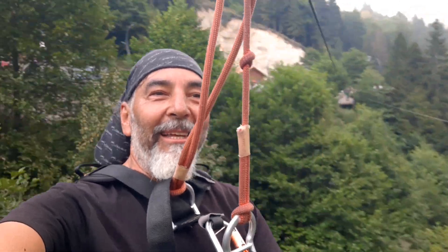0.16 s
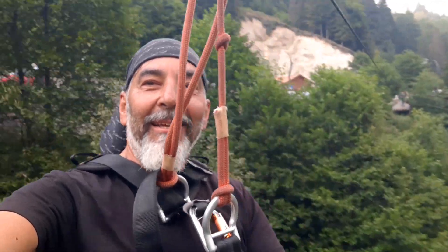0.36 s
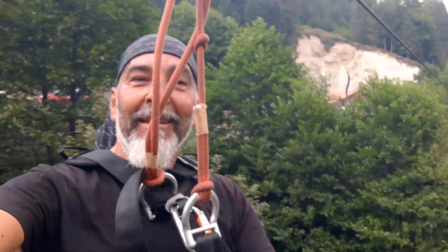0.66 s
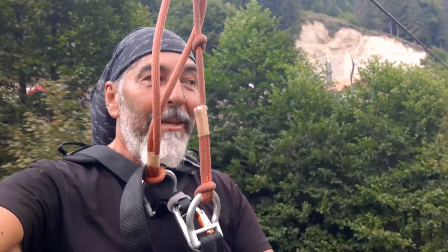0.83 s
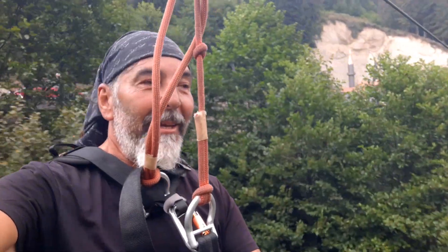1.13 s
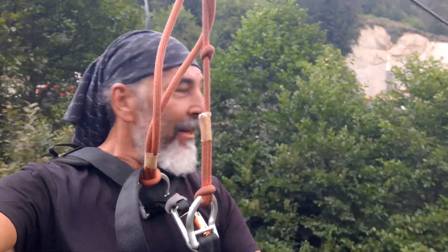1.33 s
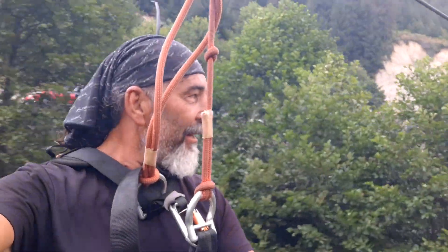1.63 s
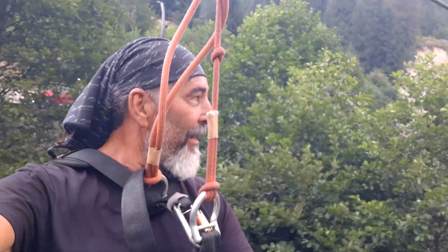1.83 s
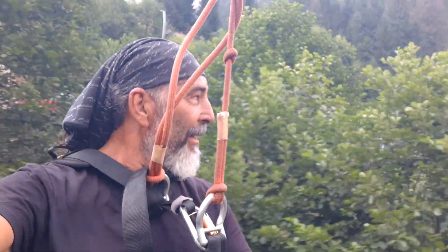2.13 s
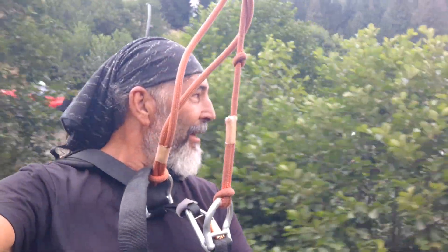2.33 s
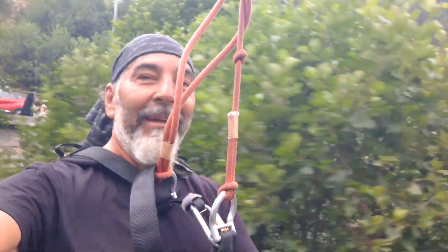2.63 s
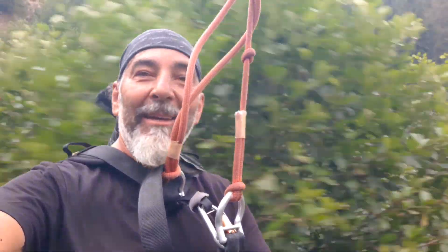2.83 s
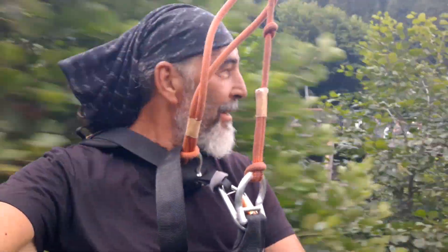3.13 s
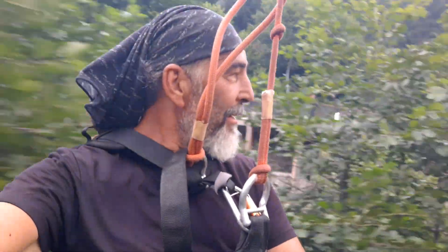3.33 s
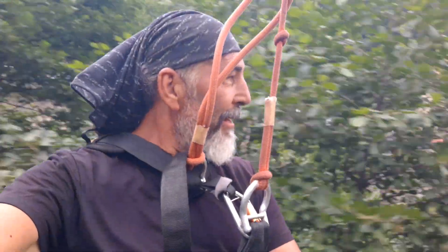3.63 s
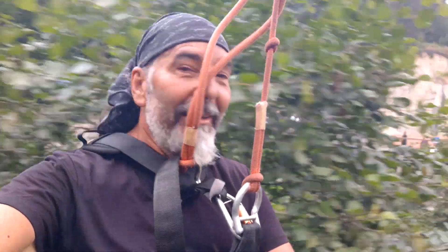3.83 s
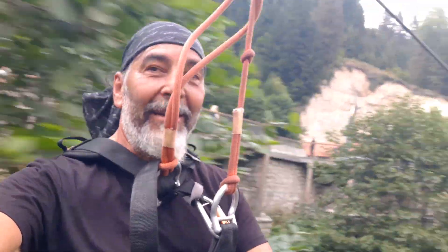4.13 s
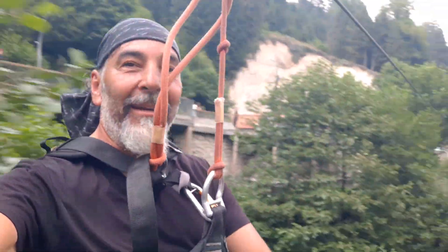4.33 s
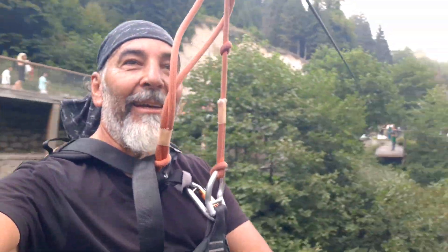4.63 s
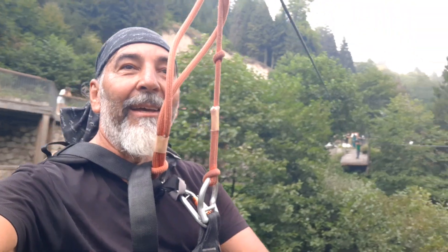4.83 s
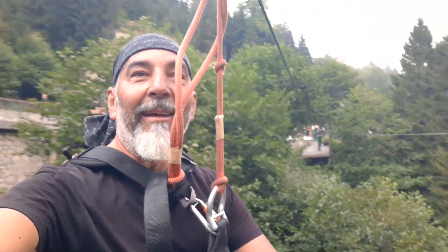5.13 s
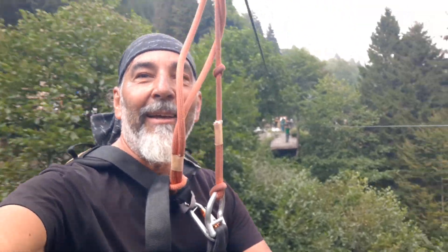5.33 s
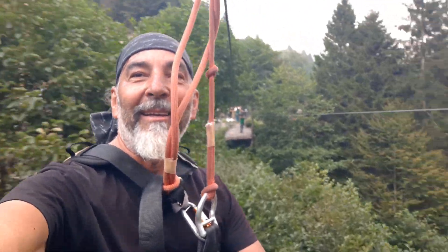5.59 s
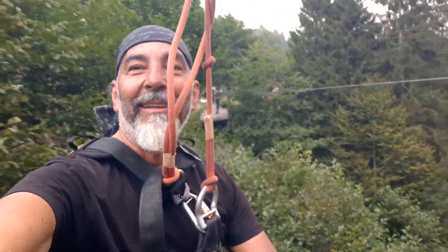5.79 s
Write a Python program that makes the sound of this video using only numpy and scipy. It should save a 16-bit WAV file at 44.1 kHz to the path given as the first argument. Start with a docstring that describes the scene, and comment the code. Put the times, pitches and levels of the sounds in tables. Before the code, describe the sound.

Outdoors in a wooded valley, a pulley trolley races along a steel cable just above the rider. A steady, dense metallic hiss buzzes with a very rapid flutter, a thin whine inside it. Small rough ticks and rubbing swells come and go, wind thumps softly in gusts, and a rasping scrape joins near the end. Close handheld stereo microphone, no echo.

```python
"""A wooded valley, crossed by a zipline: a trolley runs along a steel cable, heard by the rider below it.
The sheaves roll over the twisted strands: shaped noise gives a dense metallic hiss that throbs once a turn.
Trolley parts ring with it, burrs and rubs break in, and faint sine whines sink as the ride slows.
The trolley turns brighter and fuller or duller and thinner, and the lead of the left channel shifts;
low noise in gusts is the airstream buffeting two ports, and late in the ride the cable scrapes a cheek."""
import sys
import numpy as np
from scipy import signal
from scipy.fft import rfft, irfft, next_fast_len
from scipy.io import wavfile
from scipy.ndimage import map_coordinates

SR = 44100
rng = np.random.default_rng(int(sys.argv[2]) if len(sys.argv) > 2 else 0)


def pcm_store(signal):
    """Save signal as 16-bit PCM."""
    levels = np.round(np.clip(np.atleast_2d(signal), -1, 1) * 32767)
    wavfile.write(sys.argv[1], SR, levels.astype(np.int16).T)


N = 262664
TIME = np.arange(N) / SR
# frequency grid with room for filter tails; the floor of 1 Hz allows logarithms
FREQS = np.maximum(np.fft.rfftfreq(2 * next_fast_len(N // 2 + 1), 1 / SR), 1)


def from_db(db):
    """Decibels to gain."""
    return 10 ** (np.asarray(db) / 20)


def rms_one(x):
    """Scale to unit rms, over all rows together."""
    return x / np.sqrt(np.mean(x ** 2) + 1e-20)


def in_time(rows):
    """Each column of a curve, at every sample."""
    s, *columns = np.transpose(rows)
    return [np.interp(TIME, s, column) for column in columns]


def in_hz(points):
    """A short spectrum, at every frequency, joined along a logarithmic axis."""
    hz, value = np.transpose(points)
    return np.interp(np.log(FREQS), np.log(hz), value)


def shaped(x, gain):
    """Filter by a gain per frequency."""
    spectrum = rfft(x, 2 * (len(FREQS) - 1))
    return irfft(spectrum * gain)[..., :N]


def coloured(x, colour):
    """Filter to a relative spectrum in dB; rms 1."""
    return rms_one(shaped(x, from_db(in_hz(colour))))


def drift(rate_hz):
    """Random wandering with rms 1, mostly slower than the given rate."""
    return rms_one(shaped(rng.standard_normal(N), 1 / (1 + (FREQS / rate_hz) ** 2)))


def ring(x, modes):
    """Drive damped resonances, whose powers add; widths lie about 11 dB below each peak; rms 1."""
    power = 0
    for hz, width_hz, db in modes:
        offset = (FREQS - hz) / (0.32 * width_hz)
        power = power + from_db(db) ** 2 / (1 + offset ** 2) ** 2
    return rms_one(shaped(x, np.sqrt(power)))


def noise_paths():
    """Independent noise for the direct path and the two scattered paths."""
    return rng.standard_normal((3, N))


def chatter():
    """Quick uneven surges that one part of the trolley has for itself; rms 1."""
    rate_hz, spread_db = 110, 2.2
    return rms_one(from_db(spread_db * drift(rate_hz)))


# sheave speed along the ride: (time [s], speed [turns/s])
SHEAVE_SPEED = [(0, 47.5), (.3, 48), (1.25, 48.6), (2.6, 48.6), (2.75, 48.05), (3.6, 47.9), (4, 46.85),
                (4.7, 46.2), (5.05, 46.3), (5.6, 45.45), (5.96, 45.3)]


def sheave_speed():
    """Turns per second of the sheaves rolling along the cable."""
    return in_time(SHEAVE_SPEED)[0]


# how bright and full the trolley sounds, and how far the left channel leads:
# (time [s], fullness [0-1], lead [ms])
STEREO_SHIFT = [(0, 0.47, 0.083), (.27, 0.18, 0.067), (.38, 0.26, 0.041), (.69, 0.32, 0.03),
                (.75, 0, 0.007), (1.1, 0.1, 0.016), (1.6, 0.26, 0.032), (2.4, 0.6, 0.08),
                (3.07, 0.69, 0.083), (3.18, 0.55, 0.11), (3.68, 0.89, .13), (4.12, 1, 0.092),
                (4.36, 0.83, 0.053), (4.8, 0.26, 0.046), (5.96, 0.89, 0.029)]


def stereo_shift():
    """How bright and full the trolley sounds (0-1), and how far the left channel leads (ms)."""
    return in_time(STEREO_SHIFT)


def loudness(law):
    """Gain of a part: its level shifts with speed and with the fullness of the trolley sound."""
    cruise_turns_per_s = 48
    base_db, full_db, speed_db = law
    fullness, _ = stereo_shift()
    overspeed = sheave_speed() - cruise_turns_per_s
    return from_db(base_db + full_db * fullness + speed_db * overspeed)


def contact_force(turns, flutter_db, grains_per_s, grain_db):
    """Strands striking the groove in tiny impacts, pressed harder once a turn."""
    throb_db, throb_sharpness = 4.2, 2.4
    flutter_hz = 60
    grain_share = .33  # of the mean power
    bump = np.exp(throb_sharpness * (np.cos(2 * np.pi * turns) - 1))
    load = from_db(throb_db * bump + flutter_db * drift(flutter_hz))
    born = rng.random(N) < grains_per_s / SR
    sizes = from_db(grain_db * np.minimum(rng.exponential(1, N), 3))
    # each impact scatters into a rattle that decays in about 0.7 ms
    scatter = np.exp(-np.arange(200) / 30)
    rattle = signal.lfilter(scatter, [1], born * sizes ** 2)
    grain_power = rattle / rattle.mean()
    return rms_one(load * np.sqrt(1 - grain_share + grain_share * grain_power))


# broad colour of steel rolling on steel: (frequency [Hz], relative level per Hz [dB])
CABLE_COLOUR = [(40, -37), (250, -32.5), (480, -29.5), (690, -25), (800, -17.5), (1000, -16), (1350, -12),
                (2100, -6.5), (2680, -4), (2950, -4), (4000, -3), (4450, -5.5), (5800, -16), (7400, -29)]
# (level at fullness 0 and cruising speed [dB], gain at fullness 1 [dB], gain per extra turn per second [dB])
CABLE_LOUDNESS = (-19.3, 0.5, 0.85)


def cable_hiss(heavy_force):
    """The cable hisses under the sheaves; being heavy, it evens the impacts out."""
    return loudness(CABLE_LOUDNESS) * coloured(heavy_force * noise_paths(), CABLE_COLOUR)


# resonances of the sheave: (frequency [Hz], width [Hz], relative level [dB])
SHEAVE_RESONANCES = [(3240, 54, 0.5), (3362, 97, 3), (3483, 92, 4.5), (3580, 130, -3), (3688, 240, 1.5),
                     (3910, 190, -1), (4170, 890, -11.5)]
# its ring as the load changes: (time [s], shift of the resonances [Hz], level [dB])
SHEAVE_LOAD = [(0, 0, -21), (.4, 20, -20.5), (.6, 10, -23.5), (.85, 0, -21.5), (1.05, 0, -24),
               (1.25, -10.5, -21), (1.55, -20, -25), (1.8, 30, -23), (2.3, 0, -24), (2.55, 30, -18.5),
               (2.8, 9.5, -22), (3.05, 0.5, -22), (3.15, 40.5, -26), (3.6, 0, -21), (4.05, 0, -21),
               (4.4, 60, -21), (4.58, 39.5, -21.5), (4.8, 30, -22.5), (5.17, 20.5, -23),
               (5.45, -70.5, -22.5), (5.96, -89.5, -21)]


def sheave_ring(force):
    """The sheave rings in a narrow ridge that rises and sinks with the load, in uneven bursts."""
    wander_per_s, wander_hz = 8, 30
    bursts_per_s, burst_db = 40, 1.0
    shift_hz, db = in_time(SHEAVE_LOAD)
    shift_hz = shift_hz + wander_hz * drift(wander_per_s)
    ringing = ring(force * noise_paths(), SHEAVE_RESONANCES)
    # the analytic signal lets the whole ridge slide in frequency
    ridge = signal.hilbert(ringing, next_fast_len(N))[..., :N]
    moved = np.real(ridge * np.exp(2j * np.pi * np.cumsum(shift_hz) / SR))
    return from_db(db + burst_db * drift(bursts_per_s)) * moved


# resonances of the sheave rim: (frequency [Hz], width [Hz], relative level [dB])
RIM_RESONANCES = [(4380, 1500, 2.8), (4780, 160, 9.8), (5120, 710, 12.9), (5586, 370, 12.7),
                  (5747, 190, 13.6), (6060, 400, 6.7)]
# (level at fullness 0 and cruising speed [dB], gain at fullness 1 [dB], gain per extra turn per second [dB])
RIM_LOUDNESS = (-25, 4.5, 0.5)


def rim_ring(heavy_force, rim_rub, flange_rub):
    """The rim rings while rolling and rubbing; a leaning flange damps it."""
    damped_at_db = -33  # flange rub that halves the power of the ring
    rim_free = 1 / np.hypot(1, flange_rub / from_db(damped_at_db))
    level = rim_free * np.hypot(loudness(RIM_LOUDNESS), rim_rub)
    return level * ring(heavy_force * noise_paths() * chatter(), RIM_RESONANCES)


# resonances of the side plates: (frequency [Hz], width [Hz], relative level [dB])
PLATE_RESONANCES = [(902, 420, -15.5), (1384, 284, -6.5), (1650, 200, -7), (1928, 180, 0.5),
                    (2150, 440, 2.5), (2986, 270, -1)]
# (level at fullness 0 and cruising speed [dB], gain at fullness 1 [dB], gain per extra turn per second [dB])
PLATE_LOUDNESS = (-31, 12.5, 3.5)


def plate_ring(heavy_force):
    """The heavy side plates ring low, with the impacts evened out."""
    return loudness(PLATE_LOUDNESS) * ring(heavy_force * noise_paths(), PLATE_RESONANCES)


# colour of the fine asperities: (frequency [Hz], relative level per Hz [dB])
FIZZ_COLOUR = [(4000, -17.5), (7700, -26), (8400, -1.5), (9000, -2.5), (9700, -5), (10100, 9), (10550, 5.5),
               (10900, 2.5), (11300, 5.5), (11800, 0.5), (12400, 8.5), (13000, 1), (13550, -1), (13800, 0),
               (14400, 6), (14900, -3), (16000, -5.5)]
# (level at fullness 0 and cruising speed [dB], gain at fullness 1 [dB], gain per extra turn per second [dB])
FIZZ_LOUDNESS = (-37, 10.5, 2)


def asperity_fizz(fine_force, fizz_rub):
    """Fine asperities fizz in the treble, flickering, and swell with a rub."""
    flicker_hz, flicker_db = 6.4, 1.1
    fine = from_db(flicker_db * drift(flicker_hz)) * fine_force * noise_paths()
    return np.hypot(loudness(FIZZ_LOUDNESS), fizz_rub) * coloured(fine, FIZZ_COLOUR)


# high resonances of the bearings: (frequency [Hz], width [Hz], relative level [dB])
BEARING_RESONANCES = [(7100, 170, 9), (7560, 440, 9), (8330, 590, 6), (8900, 570, 4.5), (9900, 260, -1),
                      (10770, 190, 13), (12445, 180, 1), (13200, 300, 4), (14100, 300, 5), (15250, 400, -7)]
# (level at fullness 0 and cruising speed [dB], gain at fullness 1 [dB], gain per extra turn per second [dB])
BEARING_LOUDNESS = (-40, -5, -2.5)


def bearing_ring(force):
    """The light bearings follow every impact and ring high, in chattering surges."""
    return loudness(BEARING_LOUDNESS) * ring(force * noise_paths() * chatter(), BEARING_RESONANCES)


# bright edge of the hiss: (frequency [Hz], relative level per Hz [dB])
HISS_EDGE_COLOUR = [(3500, -47), (4400, -10), (5700, 15), (6100, 25), (6600, 22), (6950, 19.5), (7250, 13),
                    (7600, -40)]
# (level at fullness 0 and cruising speed [dB], gain at fullness 1 [dB], gain per extra turn per second [dB])
EDGE_LOUDNESS = (-40, 18, 3.5)


def hiss_edge(heavy_force):
    """A bright band edges the hiss, strongest where the trolley sounds fullest."""
    return loudness(EDGE_LOUDNESS) * coloured(heavy_force * noise_paths() * chatter(), HISS_EDGE_COLOUR)


# partials of the whine:
# (multiple of the sheave speed, peak level [dB rms], time of the peak [s], standard deviation of swell [s])
WHINE_PARTIALS = [(11, -59.5, 1.3, 1.2), (12, -62.5, 2.6, 1.4), (13.03, -54.5, 1.9, 1.9),
                  (13.03, -56, 5.1, .5), (16.05, -44.5, 1.2, 1.5), (16.94, -50, 2.6, .8),
                  (18.05, -51, 3, 2.2), (18.9, -51.5, .9, .7), (19, -51, 3, .5), (22, -49.5, 3.8, .25),
                  (23.96, -43.8, 3.2, 3.4), (26.1, -51, 4.7, .3), (27, -50, 1.3, 1.2), (29, -46, 5.65, .25)]


def whine(turns):
    """Ripples worn into the groove sing at multiples of the sheave speed; slip makes them waver."""
    blur_rad, blur_hz = .32, 22
    waver_hz, waver_db = 7, 2.7
    tones = 0
    for order, db, s, length_s in WHINE_PARTIALS:
        phase = 2 * np.pi * (order * turns + rng.random()) + blur_rad * drift(blur_hz)
        swell = np.exp(-.5 * ((TIME - s) / length_s) ** 2)
        level = from_db(db + waver_db * drift(waver_hz))
        tones = tones + swell * level * np.sin(phase)
    return np.sqrt(2) * tones


# colour of the large eddies: (frequency [Hz], relative level per Hz [dB])
LARGE_EDDY_COLOUR = [(20, -34), (40, -21), (65, -2.5), (110, 1.5), (170, 1), (250, -7.5), (350, -15),
                     (600, -23), (1500, -52)]
# smaller eddies: (frequency [Hz], width [Hz], relative level [dB])
SMALL_EDDY_BANDS = [(224, 210, 0)]
# gusts and one brief lull on the ports: (time [s], level change [dB], half-length to 1/e of the change [s])
PORT_GUSTS = [(0.07, 10.5, 0.057), (.45, 4, 0.083), (1.2, 6, 0.046), (1.316, 6, .05), (1.5, 4.5, .08),
              (1.77, 5, 0.14), (2.02, 9, 0.084), (2.2, 4, 0.055), (2.33, 4.5, 0.045), (2.46, 6.5, 0.075),
              (2.634, 7.5, .03), (2.82, 4.5, 0.086), (2.97, 5.5, 0.034), (3.08, 5.5, 0.055),
              (3.35, 1.5, .04), (3.55, -2, 0.055), (3.86, 3, .05), (4.03, 10.5, 0.083),
              (4.286, 10.5, 0.098), (4.452, 7.5, 0.037), (4.582, 7, 0.057), (4.893, 11, 0.027),
              (4.993, 8, 0.049), (5.3, 4, .05), (5.664, 7, .09), (5.95, 7, 0.04)]
# (level at fullness 0 and cruising speed [dB], gain at fullness 1 [dB], gain per extra turn per second [dB])
WIND_LOUDNESS = (-51.5, 10, 4)


def wind():
    """Lumpy low eddies, each port with its own; a gust swells them and adds smaller, higher ones."""
    lump_hz, lump_db = 32, 3.1
    small_db, small_growth = -10, 0.33  # growth in extra dB per dB of gust
    gust_db = sum(db * np.exp(-((TIME - s) / length_s) ** 2) for s, db, length_s in PORT_GUSTS)
    large = coloured(rng.standard_normal((2, N)), LARGE_EDDY_COLOUR)
    small = ring(rng.standard_normal((2, N)), SMALL_EDDY_BANDS)
    eddies = large + from_db(small_db + small_growth * gust_db) * small
    lumps = from_db(lump_db * np.array([drift(lump_hz), drift(lump_hz)]))
    return loudness(WIND_LOUDNESS) * from_db(gust_db) * rms_one(lumps) * eddies


# larger burrs on the cable passing under a sheave: (time [s], strength [dB])
CABLE_BURRS = [(.081, -14.5), (.215, 0), (.408, -1), (.437, 3), (.45, 0), (.803, 0), (1.1693, -3),
               (1.219, 2), (1.3783, -3), (1.745, 7.5), (1.755, 3), (1.771, 0), (2.099, 7), (2.121, -4),
               (2.949, -5), (2.975, -11), (3.134, -10), (3.244, -1), (3.278, -4), (4.592, -5), (4.856, -7),
               (4.992, 2), (5.1632, 5), (5.255, -6), (5.484, 0), (5.909, -9), (5.936, -7), (5.948, -9)]


def burrs():
    """Short surges of the contact force, each dying away exponentially."""
    decay_s = .005
    kicks = np.zeros(N)
    for s, db in CABLE_BURRS:
        kicks[round(s * SR)] = from_db(db)
    return signal.lfilter([1], [1, -np.exp(-1 / (decay_s * SR))], kicks)


# the cable rides up one side of a sheave and comes free again:
# (time of hardest rub [s], swell [dB/s], flange ring [dB], groove ring [dB], rim ring [dB], fizz [dB])
CABLE_RUBS = [(.12, 23, -28.5, -20.5, -29, -31.5), (.39, 113, -37, -46, -21, -33.5),
              (1.25, 20, -50, -31, -32, -46), (2.65, 14, -50, -24.5, -22.5, -30.5),
              (4.3, 60.5, -50, -45, -29, -44), (4.72, 15, -42, -51, -43, -33),
              (5.4, 35, -27.5, -45, -55, -34.5), (5.88, 18, -25, -44, -50, -36)]


def rubbing():
    """Gains of flange, groove, rim and fizz: each rub swells at its own rate, and all fade alike."""
    fade_db_per_s = 24.5
    s, swell_db_per_s, *levels_db = np.transpose(CABLE_RUBS)[..., None]
    drop_db = np.maximum(swell_db_per_s * (s - TIME), fade_db_per_s * (TIME - s))
    # the powers of overlapping rubs add
    return [np.linalg.norm(from_db(db - drop_db), axis=0) for db in levels_db]


# resonances of the rubbing flange: (frequency [Hz], width [Hz], relative level [dB])
FLANGE_RESONANCES = [(1325, 110, -1), (3050, 400, 1), (3380, 130, 8.5), (3970, 240, 3), (4760, 200, -2),
                     (5750, 200, -4), (6200, 380, -2), (7030, 260, -6), (7650, 700, -13), (9400, 600, -11),
                     (13250, 450, -7)]


def flange_ring(force, flange_rub):
    """The flange rings in chattering surges as the cable rubs it."""
    return flange_rub * ring(force * noise_paths() * chatter(), FLANGE_RESONANCES)


# resonances of the rubbed groove wall: (frequency [Hz], width [Hz], relative level [dB])
GROOVE_RESONANCES = [(2900, 260, -2), (3600, 220, -3.5), (4100, 240, -1), (4650, 690, -5), (5000, 620, -15),
                     (6100, 220, -19), (6500, 700, -22)]


def groove_ring(force, groove_rub):
    """The wall of the groove rings as the cable rubs it."""
    return groove_rub * ring(force * noise_paths(), GROOVE_RESONANCES)


def rolling(force):
    """The contact force excites every part; rows are the direct and two scattered paths."""
    flange_rub, groove_rub, rim_rub, fizz_rub = rubbing()
    # exponents below 1 even out the impacts, most of all in the heavy parts
    heavy_force, fine_force = force ** 0.39, force ** 0.68
    return (cable_hiss(heavy_force)
            + sheave_ring(force)
            + rim_ring(heavy_force, rim_rub, flange_rub)
            + plate_ring(heavy_force)
            + asperity_fizz(fine_force, fizz_rub)
            + bearing_ring(force)
            + hiss_edge(heavy_force)
            + flange_ring(force, flange_rub)
            + groove_ring(force, groove_rub))


# resonances of the scraped cheek: (frequency [Hz], width [Hz], relative level [dB])
CHEEK_RESONANCES = [(4830, 300, -1), (5040, 330, -2), (5230, 300, -6)]


def scrape(force):
    """Late on, the cable scrapes a sheave's cheek: a rough band sets in quickly, then fades gradually."""
    start_s, attack_s = 5.2, .08
    start_db, fade_db_per_s = -22, 7
    since_s = TIME - start_s
    attack = np.clip(since_s / attack_s, 0, 1)
    level = attack * from_db(start_db - fade_db_per_s * np.maximum(since_s, 0))
    return level * ring(force * chatter() * noise_paths(), CHEEK_RESONANCES)


# left-right likeness of the trolley sound: (frequency [Hz], shared power [0-1])
PORT_LIKENESS = [(200, 0.3), (700, 0.75), (1200, 0.86), (2700, 0.95), (3600, 0.93), (4600, 0.74),
                 (5800, 0.93), (7000, 0.6), (10000, 0.36), (12500, 0.42), (15000, 0)]
# shading of the ports by the housing: (frequency [Hz], left minus right [dB])
PORT_SHADE = [(500, -1), (770, 1.5), (1170, -2.5), (1790, -3), (2740, -0.5), (4000, -1.5), (5200, 2.5),
              (6500, 1.5), (9000, -0.5)]
# lag that the housing adds to the right port: (frequency [Hz], phase [rad])
PORT_BEND = [(450, -0.13), (900, -0.74), (1230, -0.65), (1600, 0.15), (1900, 0.061), (2200, 0.35),
             (2680, 0.57), (3000, -0.068), (3400, 0), (3850, 0.4), (4400, 0.58), (5000, -0.096),
             (5650, -0.61), (6150, -0.2), (6600, 0.00074), (7050, -1.06), (8000, -0.89)]


def at_ports(paths, tones=0, extra_lead_ms=0):
    """The left channel leads in the direct sound; scattered sound differs at each port."""
    alike = np.clip(in_hz(PORT_LIKENESS), 0, 1)
    _, lead_ms = stereo_shift()
    left = shaped(paths[0], np.sqrt(alike)) + tones
    bent = shaped(left, np.exp(-1j * in_hz(PORT_BEND)))
    delayed = (TIME - (lead_ms + extra_lead_ms) / 1000) * SR
    right = map_coordinates(bent, [delayed], order=3, mode="nearest")
    both = np.array([left, right]) + shaped(paths[1:], np.sqrt(1 - alike))
    return shaped(both, from_db(in_hz(PORT_SHADE) * [[.5], [-.5]]))


def scene():
    """One sheave speed drives both the throb of the hiss and the whine."""
    turns = np.cumsum(sheave_speed()) / SR
    force = contact_force(turns, flutter_db=1.0, grains_per_s=380, grain_db=1.5)
    trolley = at_ports(rolling(force + burrs()), whine(turns))
    return trolley + at_ports(scrape(force), extra_lead_ms=.035) + wind()


def record(dry):
    """The ports have a narrow dip in the treble; the highest peaks are rounded and the top is cut steeply."""
    dip_hz, dip_width_hz, dip_db = 7600, 350, -7
    ceiling, cutoff_hz = .92, 15850
    dip = from_db(dip_db * np.exp(-((FREQS - dip_hz) / dip_width_hz) ** 2))
    sound = shaped(dry, dip)
    rounded = sound / (1 + (sound / ceiling) ** 8) ** (1 / 8)
    return shaped(rounded, FREQS < cutoff_hz)


dry = scene()
out = record(dry)
pcm_store(out)
```